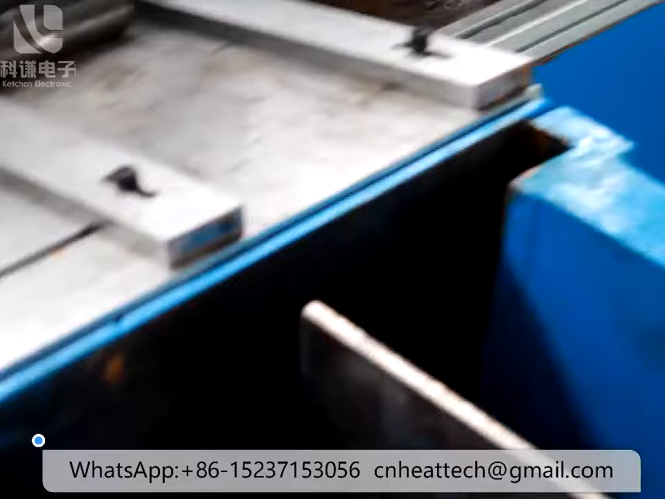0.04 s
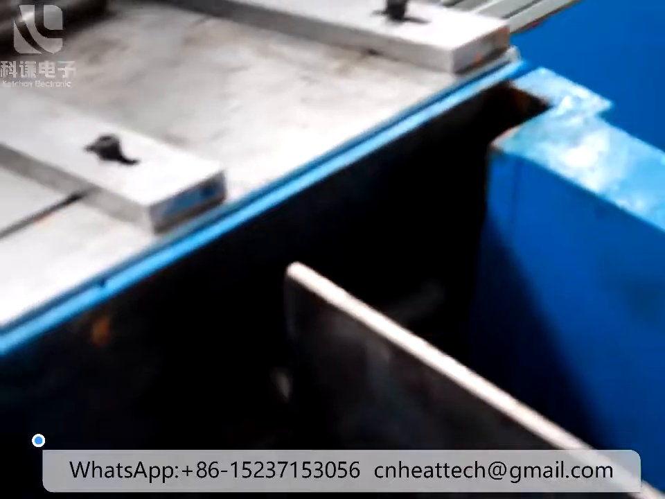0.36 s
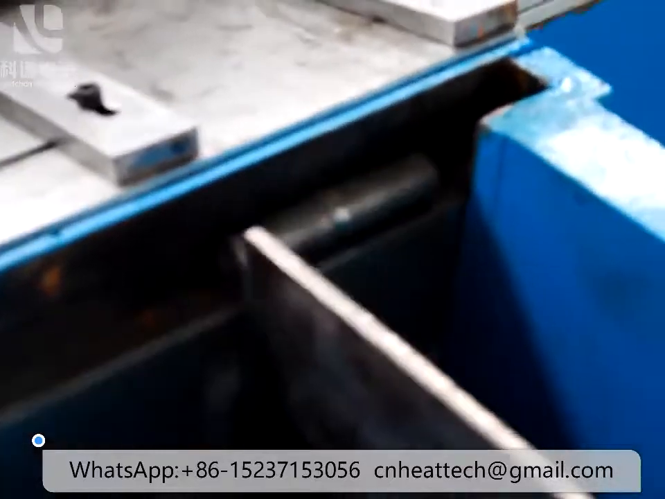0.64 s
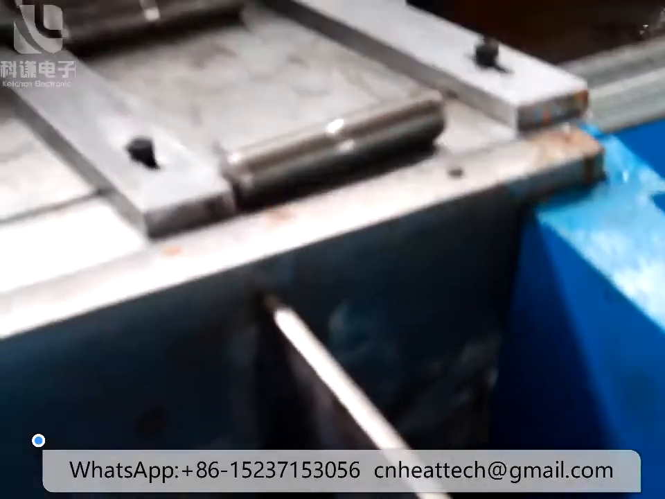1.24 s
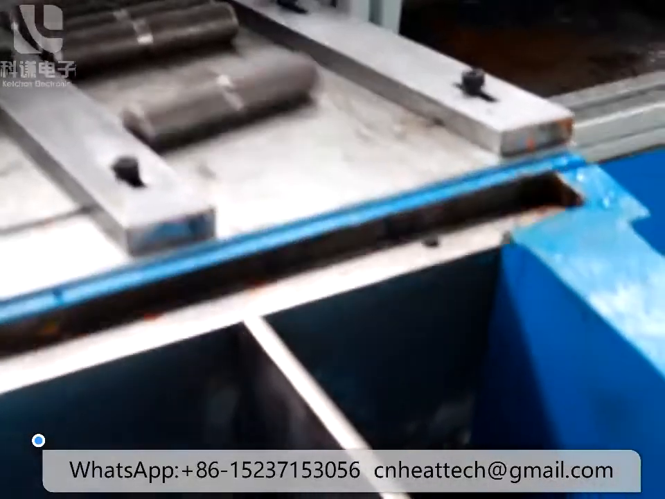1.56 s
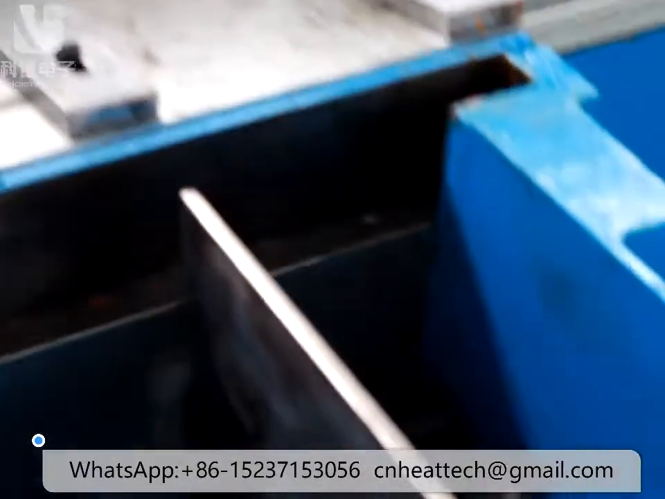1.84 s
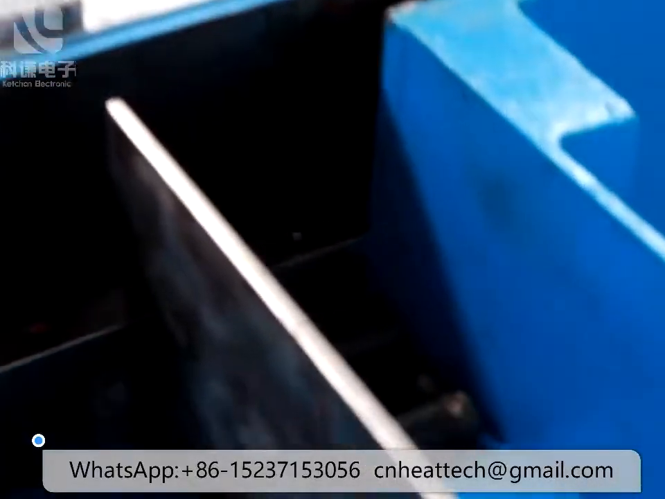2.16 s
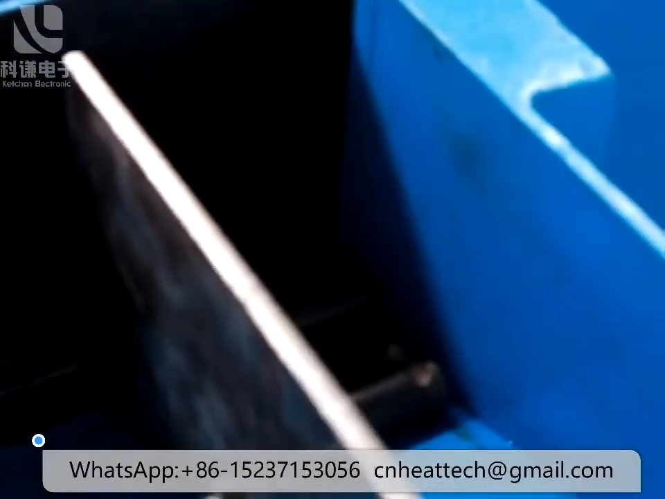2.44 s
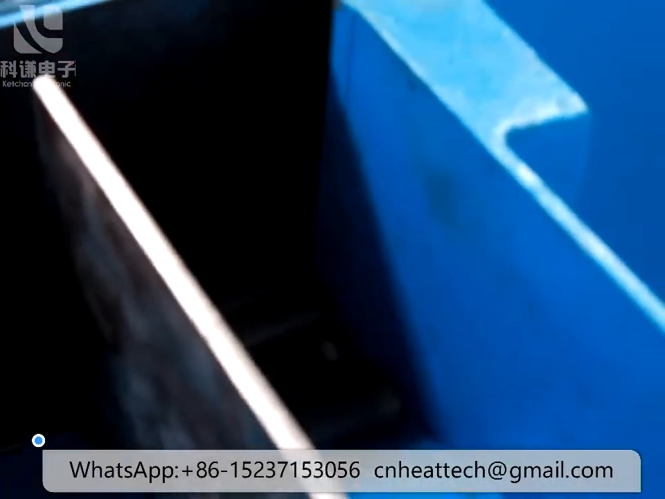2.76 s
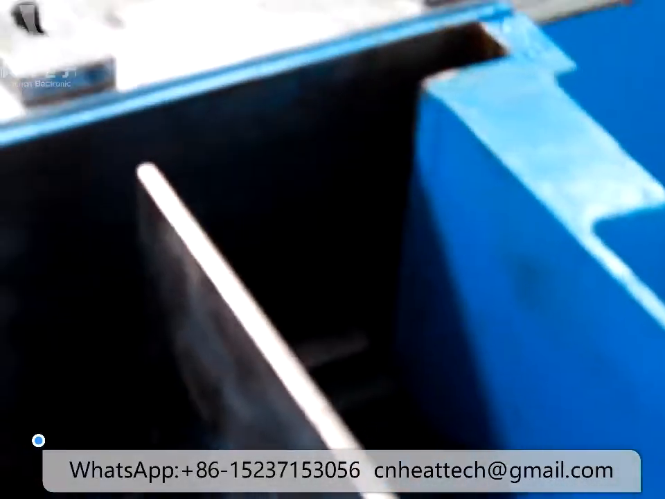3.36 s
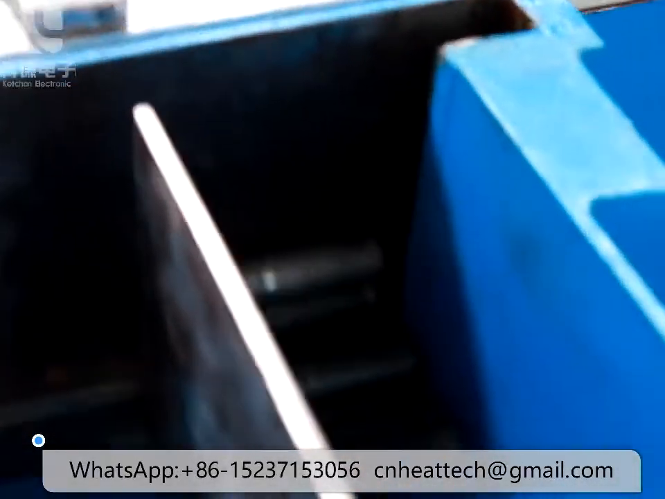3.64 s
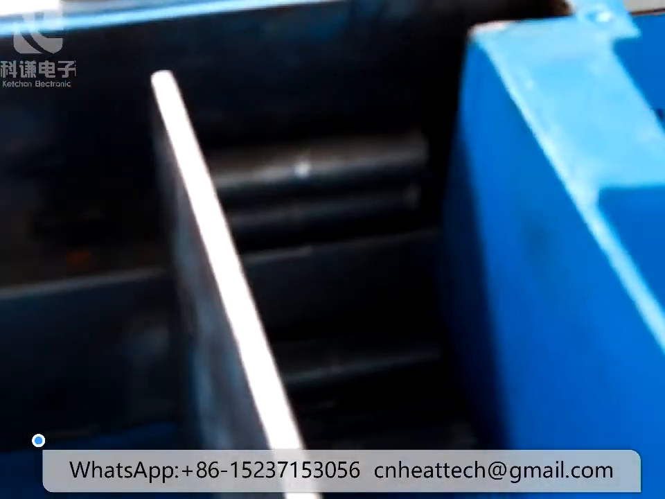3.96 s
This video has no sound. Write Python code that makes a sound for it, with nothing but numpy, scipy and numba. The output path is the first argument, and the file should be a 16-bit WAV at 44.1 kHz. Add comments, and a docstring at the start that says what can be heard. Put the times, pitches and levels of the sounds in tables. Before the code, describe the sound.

Steel pins clank and roll in a feeder machine while its lifter scrapes, thumps and, near the end, squeals faintly. Heard from close by, with a factory's roar and hiss behind, dipping briefly after each loud clank.

```python
"""A factory roar with air hiss and whines, and a steel lifter scraping up and down in a pin feeder,
heard in stereo from close beside a hardening machine. Pins clank against the steel plates and ring on;
the frame thumps at the ends of the strokes, and the hopper resonates with scrapes and blows. Near the
end the rubbing steel sings faintly. The recorder's gain control ducks everything after each loud clank
and lets it swell back."""
import sys
import numpy as np
from scipy import signal
from scipy.fft import rfft, irfft
from scipy.io import wavfile
from scipy.ndimage import uniform_filter1d
from numba import njit

SR = 44100
rng = np.random.default_rng(int(sys.argv[2]) if len(sys.argv) > 2 else 0)


def to_wav(s):
    """Save 16-bit WAV."""
    ch = np.atleast_2d(s).T  # columns
    pcm = np.round(np.clip(ch, -1, 1) * 32767)  # PCM
    wavfile.write(sys.argv[1], SR, pcm.astype(np.int16))


N = 176400
TIME = np.arange(N) / SR


def undb(db):
    """Decibels to gain."""
    return 10 ** (np.asarray(db) / 20)


def unit(x):
    """Scale to rms 1."""
    return x / np.sqrt(np.mean(x ** 2))


def add(out, start, x):
    """Mix a sound in at a start time in seconds."""
    i = int(start * SR)
    out[:, i:i + x.shape[-1]] += x[..., :N - i]


def drift(rate_hz):
    """Smooth random drift with spread near 1."""
    hold = int(SR / rate_hz)
    steps = np.repeat(rng.standard_normal(N // hold + 1), hold)
    return 1.64 * uniform_filter1d(uniform_filter1d(steps, hold), hold)[:N]


def butter(x, hz, kind, order):
    """Butterworth low-pass or high-pass."""
    return signal.sosfilt(signal.butter(order, min(hz / (SR / 2), .9), kind, output="sos"), x)


def noise(size):
    """Stereo white noise that is wide only in the treble."""
    mid, side = rng.standard_normal((2, size))
    side = 0.33 * butter(side, 4080, "high", order=14)
    return np.array([mid + side, mid - side])


def colour(x, spectrum):
    """Shape by a spectrum that falls away above its last point; rms 1."""
    hz, db = np.array(spectrum).T
    f = np.maximum(np.arange(N // 2 + 1) * SR / N, 1)
    gain = undb(np.interp(np.log(f), np.log(hz), db)) / np.maximum(f / hz[-1], 1) ** 2
    return unit(irfft(rfft(x) * gain, N))


def band(x, hz, q=1):
    """Two band-passes in a row; white noise keeps its level."""
    b, a = signal.iirpeak(min(hz, SR / 4), max(q / 2, hz / SR * 4), SR)
    twice = lambda v: signal.lfilter(b, a, signal.lfilter(b, a, v))
    return twice(x) / np.linalg.norm(twice(signal.unit_impulse(SR // 10)))


def fade(t, t60):
    """Exponential decay, 60 dB down after t60 seconds."""
    return np.exp(-np.log(1000) * t / t60)


# Spectra of the roar and air hiss behind the feeder. Each row: frequency in Hz, relative density in dB.
ROAR_SPECTRUM = [(15, -71), (25, -45), (127, -13.5), (150, -10), (304, -3.5), (351, -9), (385, -5.5),
                 (647, -8.5), (944, -9.5), (1010, -7), (1110, -8.5), (2480, -14.5), (4270, -24.5),
                 (7000, -40), (9100, -38), (15400, -120)]
HISS_SPECTRUM = [(3000, -17), (5000, 1.5), (7000, 0), (8300, 3), (9500, 1.5), (12000, 6), (14000, 4.5),
                 (16000, 5)]
# Machine tones on the factory floor. Each row: pitch in Hz, level in dB.
WHINES = [(300, -28.5), (520, -31), (958, -23), (1935, -29.5), (2440, -32), (3533, -37.5), (3865, -45),
          (4870, -43)]

def factory():
    """A wavering machine roar, steady air hiss and wandering whines; the top treble flickers slightly."""
    roar = colour(noise(N), ROAR_SPECTRUM) * undb(-14.5 + drift(rate_hz=23.7))
    hiss = colour(noise(N), HISS_SPECTRUM) * undb(-16.5 + 1.36 * drift(rate_hz=70))
    whine = 0
    for hz, db in WHINES:
        pitch_hz = hz + 2.544 * drift(rate_hz=20)
        whine += undb(db) * np.sqrt(2) * np.sin(2 * np.pi * np.cumsum(pitch_hz) / SR)
    return roar + hiss + whine


# The lifter's travel, close to the microphone.
# Each row: time in seconds, then scraping, rumbling and rolling levels in dB.
TRAVEL = [(0, -7.5, -9.5, -12), (.3, -33, -24, -21.5), (.58, -16, -18.5, -15.5), (.67, -13.5, -15, -19),
          (.7, -7.5, -12.5, -13), (.78, -5, -8.5, -15.5), (.82, -7.5, -11.5, -19), (.9, -8, -9, -12),
          (1.05, -9.5, -13, -19), (1.3, -15, -20, -15), (1.5, -17, -21.5, -19.5),
          (1.77, -16.5, -18.5, -14.5), (1.9, -34, -16.5, -36), (2.1, -24, -25, -20), (2.22, -14, -8.5, -18),
          (2.4, -12, -16, -24), (2.53, -20, -14, -25), (2.601, -7, -9.5, -14), (2.7, -16, -15.5, -36),
          (2.88, -13, -14.5, -11), (3.1, -20.5, -20, -20.5), (3.3, -15, -18.5, -19), (3.6, -24, -19, -16.5),
          (4, -18, -21.5, -20.5)]
# Spectra of those three sounds. Each row: frequency in Hz, relative density in dB.
SCRAPE_SPECTRUM = [(200, -54), (450, 0), (800, 6.5), (1200, 2), (2200, -6), (4000, -19), (7000, -53)]
RUMBLE_SPECTRUM = [(40, -42), (80, -5.5), (180, -1), (330, 2), (450, -0.5), (800, -16)]
ROLLING_SPECTRUM = [(900, -13.5), (1400, 2), (1860, 2.5), (2050, 1), (2200, 6), (2330, -4), (2460, -7),
                    (2650, -1.5), (3400, -7.5), (4500, -14), (7000, -47)]

def lifter(catches_per_s=1100, spread_db=1):
    """Steel scrapes in dense, uneven catches, the loaded guides rumble and pins roll along the plate."""
    times, *levels = np.array(TRAVEL).T
    out = 0
    for spectrum, db in zip((SCRAPE_SPECTRUM, RUMBLE_SPECTRUM, ROLLING_SPECTRUM), levels):
        catches = (rng.random(N) < catches_per_s / SR) * rng.choice([-1, 1], N)
        strength = undb(-spread_db * rng.standard_normal(N))
        out += colour(catches * strength, spectrum) * undb(np.interp(TIME, times, db))
    return out


# Grit on the sliding steel, heard close up. Each row: frequency in Hz, relative density in dB.
GRIT_SPECTRUM = [(3000, -23), (4800, 1), (6500, -6), (8000, -1), (10500, 10), (14000, 7)]

def grit(grains_per_s=600, spread_db=6.5):
    """Fine grit crackles in step with the scraping, 21 dB below it."""
    times, scrape_db = np.array(TRAVEL).T[:2]
    grains = (rng.random(N) < grains_per_s / SR) * noise(N)
    strength = undb(spread_db * rng.standard_normal(N))
    return colour(grains * strength, GRIT_SPECTRUM) * undb(np.interp(TIME, times, scrape_db) - 21)


# Modes of the feeder's steel hopper. Each row: frequency in Hz, 60 dB decay in seconds, gain in dB.
HOPPER_MODES = [(186, 0.13, -5), (257.4, 0.12, 1.5), (297.7, 0.31, 5.5), (450, 0.31, -2.5),
                (838, 0.13, 0.5), (1147, 0.16, 2)]

def hopper(x):
    """The steel walls pass a sound on and add their own modes."""
    out = x.copy()
    for hz, t60, db in HOPPER_MODES:
        radius, cosine = fade(1 / SR, t60), np.cos(2 * np.pi * hz / SR)
        mode = signal.lfilter([1, -radius * cosine], [1, -2 * radius * cosine, radius ** 2], x)
        out += undb(db) * 2 * (1 - radius) * mode
    return out


# Pins hitting the plates near the microphone. Each row: start in seconds, level in dB, brightness in Hz,
# chatter length in seconds, 60 dB decay in seconds, ring level in dB, ring centre in Hz.
CLANKS = [(0.1286, 2, 4100, 0.0034, 0.027, -20, 3900), (0.3318, 14.5, 1130, 0.0064, 0.11, 6, 1610),
          (0.332, 13, 6400, 0.018, 0.049, -2, 2750), (0.3826, 5, 1900, 0.0075, 0.096, -3, 1730),
          (0.405, -1.5, 1110, 0.027, 0.19, -14, 1600), (1.177, -3.5, 1700, 0.003, 0.05, -13, 1600),
          (1.187, 12, 2300, 0.0043, 0.02, 3, 3300), (1.2343, 2, 1850, 0.006, 0.072, -11, 2050),
          (1.3589, 0.5, 1990, 0.004, 0.041, -15, 2190), (1.575, -8.5, 4400, 0.0045, 0.025, -26, 3900),
          (1.798, 21, 2700, 0, 0.042, 4, 1940), (1.8709, 14, 2800, 0, 0.043, 0.5, 2040),
          (2.2736, 7, 895, 0.019, 0.17, -20, 1400), (2.275, -2, 4030, 0.013, 0.08, -26, 3300),
          (2.654, -0.5, 4250, 0.014, 0.11, -26, 3500), (2.893, 7, 3360, 0.016, 0.042, 1, 3500),
          (2.908, 20, 1100, 0, 0.11, 2, 1650), (2.908, 15, 5540, 0.021, 0.068, 1, 3700),
          (2.927, 12, 1500, 0.000081, 0.026, -4, 1400), (3.285, 1.5, 1960, 0.0094, 0.093, -3, 2320),
          (3.532, -8, 1600, 0.01, 0.024, -22, 3280), (3.95, 9, 760, 0, 0.12, -17, 1290)]

def clanks():
    """A pin hits steel: a crack, a short chatter, a duller tail and the plate's ring."""
    out, t = np.zeros((2, N)), np.arange(SR // 2) / SR
    for start, db, hz, chatter_s, t60, ring_db, ring_hz in CLANKS:
        crack = band(noise(len(t)) * np.exp(-t / 0.0034), 0.71 * hz)
        crack = butter(crack, 6.7 * hz, "low", order=6)
        chatter = band(noise(len(t)) * fade(np.maximum(t - chatter_s, 0), t60), hz)
        tail = undb(-26) * band(noise(len(t)) * fade(t, t60=0.54), 0.52 * hz)
        body = butter(chatter + tail, 3780, "low", order=3)
        add(out, start, undb(db) * (undb(-4.5) * crack + undb(-2.5) * body))
        add(out, start, undb(ring_db) * plate_ring(t, ring_hz))
    return out


# Modes of the struck plate. Each row: frequency in Hz, 60 dB decay in seconds, relative level in dB.
PLATE_MODES = [(1376, 0.31, -6), (1497, 0.26, -12), (1715, 0.21, -0.5), (1980, 0.1, -1.5), (2170, 0.08, -4),
               (2350, .16, -3.5), (2640, .05, -2), (2790, 0.26, -0.5), (2915, 0.064, -1), (3155, .04, 0),
               (3420, 0.081, -15), (3890, 0.081, -2), (4790, .08, -6)]

def plate_ring(t, centre_hz, spread_octaves=0.15, attack_s=0.0006, flutter_db=5.5):
    """The plate rings; where the pin lands decides which of its modes sound most."""
    ring = 0
    for hz, t60, db in PLATE_MODES:
        share = np.exp(-.5 * (np.log2(hz / centre_hz) / spread_octaves) ** 2)
        ring += share * undb(db) * fade(t, t60) * np.sin(2 * np.pi * (hz * t + rng.random()))
    flutter = undb(flutter_db * drift(rate_hz=71)[:len(t)])
    return ring * (1 - np.exp(-t / attack_s)) * flutter


# The lifter knocking in its frame, close by.
# Each row: start in seconds, level in dB, pitch in Hz, 60 dB decay in seconds.
THUMPS = [(.314, 0.5, 433.5, 0.34), (.319, -1.5, 800, 0.24), (.757, -4, 465, 0.23), (.787, -3, 710, 0.14),
          (1.727, -4.5, 253.3, 0.14), (2.111, -1, 262, 0.14), (2.127, -7, 181, 0.28), (2.275, 7, 310, 0.12),
          (2.354, 2.5, 278, 0.15), (2.407, -2, 299.6, 0.21), (3.715, -12, 190, 0.17), (3.943, -2, 297, 0.2)]

def thumps():
    """The end of a stroke draws a dull thud and a low note from the frame."""
    out, t = np.zeros((2, N)), np.arange(SR // 2) / SR
    for start, db, hz, t60 in THUMPS:
        decay = fade(t, t60)
        thud = unit(band(noise(len(t)) * decay, hz, q=1.12)) * np.sqrt(np.mean(decay ** 2))
        note = decay * np.sin(2 * np.pi * hz * t) * (1 - np.exp(-hz * t))
        add(out, start, undb(db - 2.5) * (thud + note))
    return out


# Pins in the feeder left free to ring by a blow.
# Each row: start in seconds, level in dB, pitch in Hz, 60 dB decay in seconds.
PIN_RINGS = [(.332, -5, 7860, 0.35), (.394, -8, 7850, 0.14), (1.177, -6.5, 7860, 0.16),
             (1.3575, -12.5, 6150, 0.045), (1.798, 11.5, 8020, 0.14), (1.871, 7, 8025, 0.11),
             (2.902, 4, 7840, 0.26), (2.93, -16, 7860, 0.7)]

def pins(pair_hz=8020, attack_s=0.0012, waver_db=2.5):
    """A struck pin ticks, then rings in two bending modes and a faint overtone, wavering as it rocks."""
    out, t = np.zeros((2, N)), np.arange(SR) / SR
    stereo_phase = np.array([[0.034], [-0.034]])
    for start, db, hz, t60 in PIN_RINGS:
        modes = [(hz, 0), (pair_hz, -4), (1.5 * hz, -24)]
        ring = sum(undb(mode_db) * np.sin(2 * np.pi * f * t + stereo_phase) for f, mode_db in modes)
        ring *= (1 - np.exp(-t / attack_s)) * fade(t, t60)
        tick = undb(-1.5) * band(noise(len(t)) * fade(t, t60=0.028), hz, q=5.1)
        add(out, start, undb(db + waver_db * drift(rate_hz=200)[:SR]) * (ring + tick))
    return out


# Squeals, faint even this close. Each row: start in seconds, length in seconds, level in dB, pitch in Hz.
SQUEALS = [(3.535, 0.12, -19.5, 2416), (3.801, 0.21, -19.5, 1804), (3.85, 0.15, -25, 2450)]

def squeals(wander_hz=10):
    """Rubbing steel sings short, unsteady notes that swell and fade."""
    out = np.zeros((2, N))
    for start, length, db, hz in SQUEALS:
        n = int(length * SR)
        phase = 2 * np.pi * np.cumsum(hz + wander_hz * drift(rate_hz=79)[:n]) / SR
        add(out, start, undb(db) * np.sqrt(2 * np.hanning(n)) * np.sin(phase))
    return out


def scene():
    """At the microphone: the feeder sounds through its hopper and pins ring, with the factory behind."""
    return factory() + hopper(lifter() + clanks() + thumps()) + pins() + grit() + squeals()


@njit
def follow(level, attack_s, release_s):
    """Level follower, quick up and slow down."""
    out, held = np.empty(len(level)), 0.
    for i in range(len(level)):
        held += (level[i] - held) / (SR * (attack_s if level[i] > held else release_s))
        out[i] = held
    return out


def duck(x, level, top_db, attack_s, release_s):
    """Turn the sound down by as much as its followed level exceeds the top."""
    return x / np.maximum(follow(level, attack_s, release_s) / undb(top_db), 1)


def record(dry, start_s=0.071, top_hz=15900):
    """Silent for an instant, the recorder then ducks loud sounds, limits peaks and cuts the top treble."""
    ridden = duck(dry, np.abs(dry).mean(axis=0), top_db=-11.5, attack_s=0.0084, release_s=0.23)
    limited = duck(ridden, np.abs(ridden).max(axis=0), top_db=-3, attack_s=0.000095, release_s=0.0028)
    clipped = np.clip(limited, -1, 1) * (TIME >= start_s)
    return signal.sosfilt(signal.ellip(10, .2, 80, top_hz, fs=SR, output="sos"), clipped)


dry = scene()
out = record(dry)
to_wav(out)
```